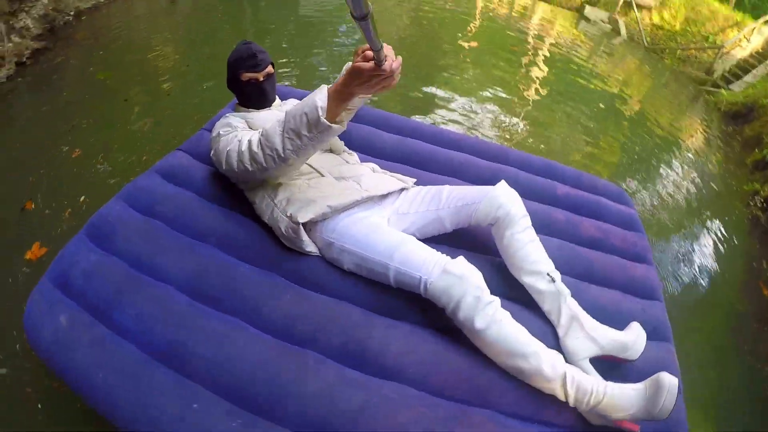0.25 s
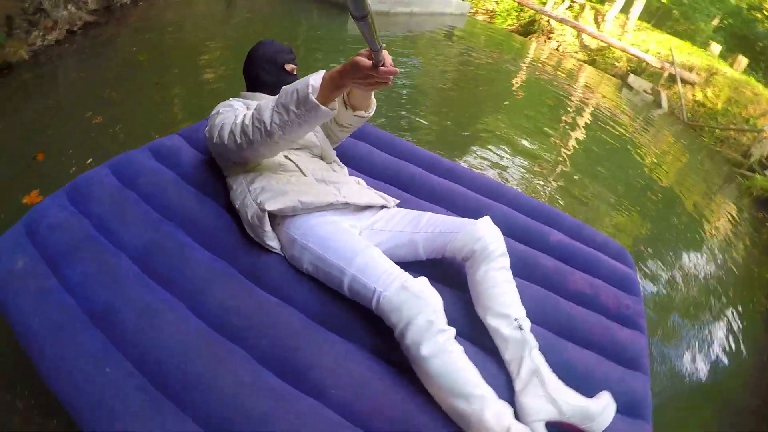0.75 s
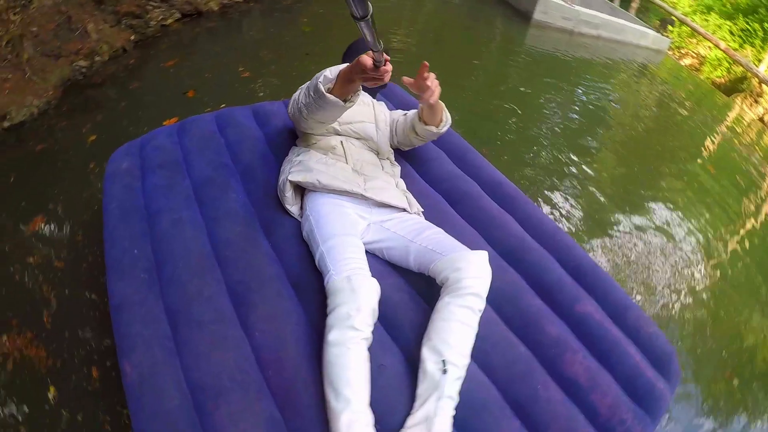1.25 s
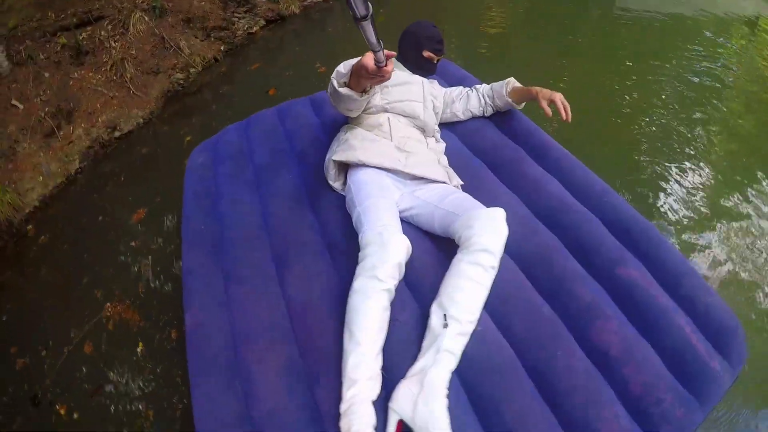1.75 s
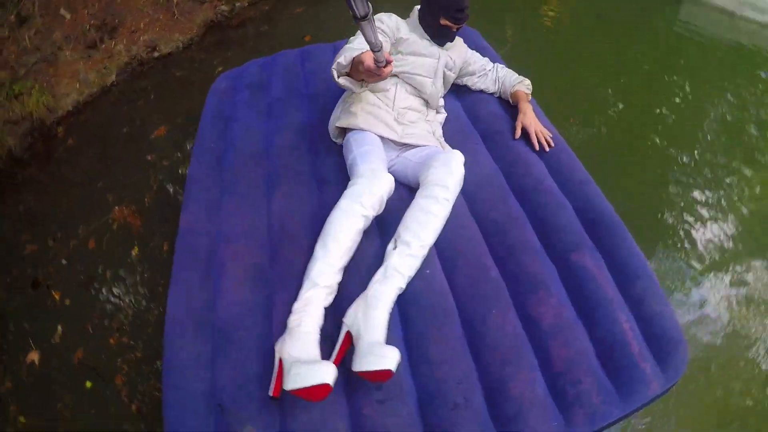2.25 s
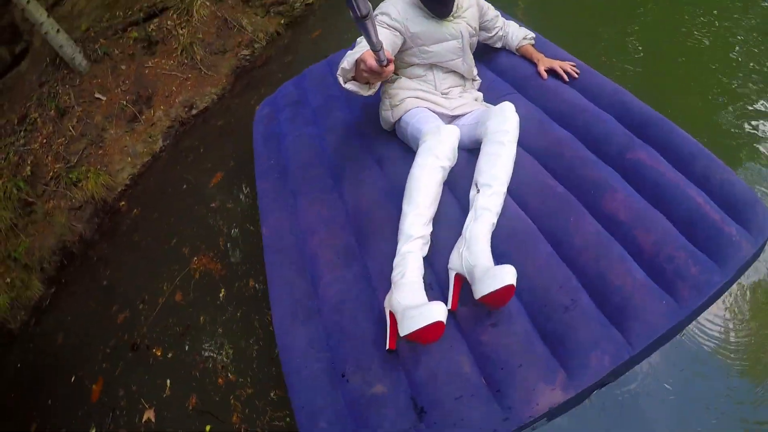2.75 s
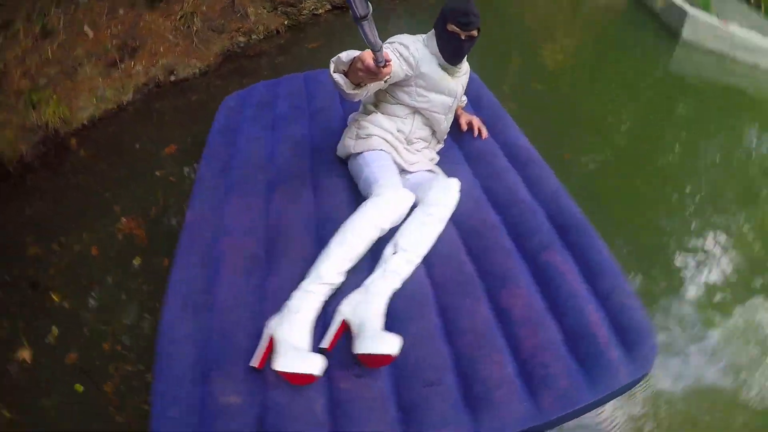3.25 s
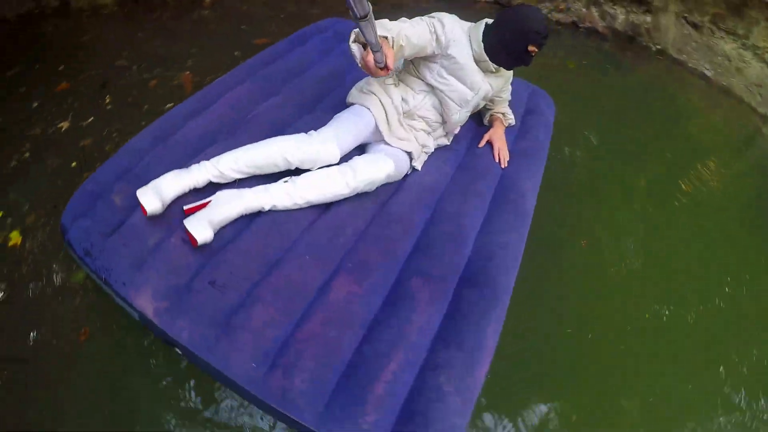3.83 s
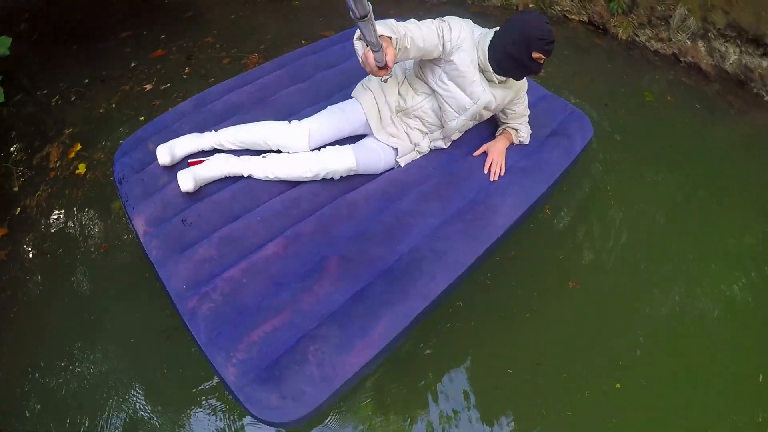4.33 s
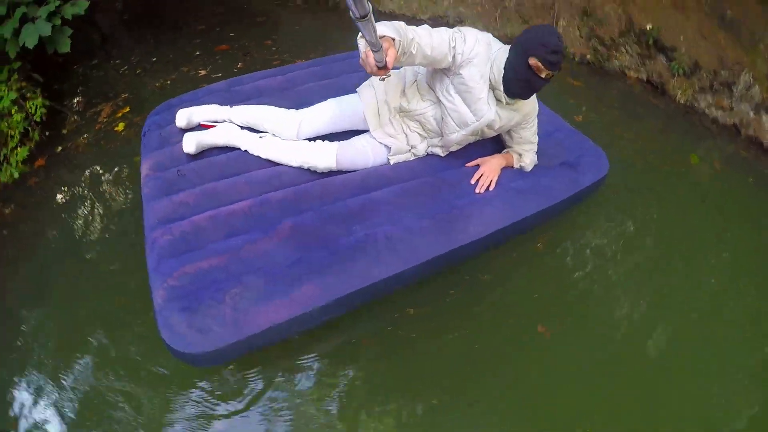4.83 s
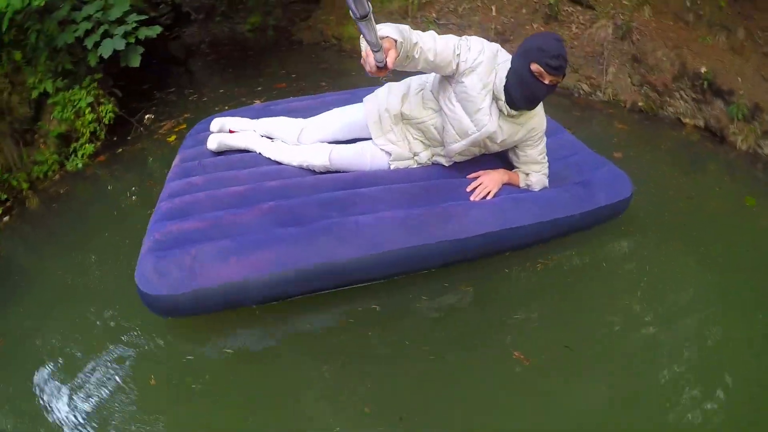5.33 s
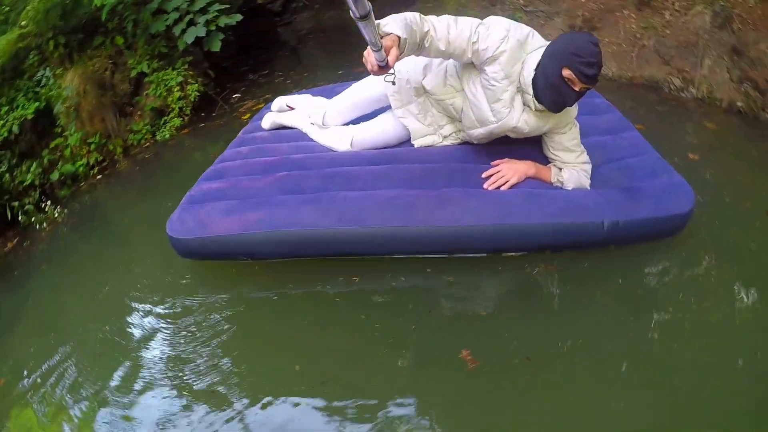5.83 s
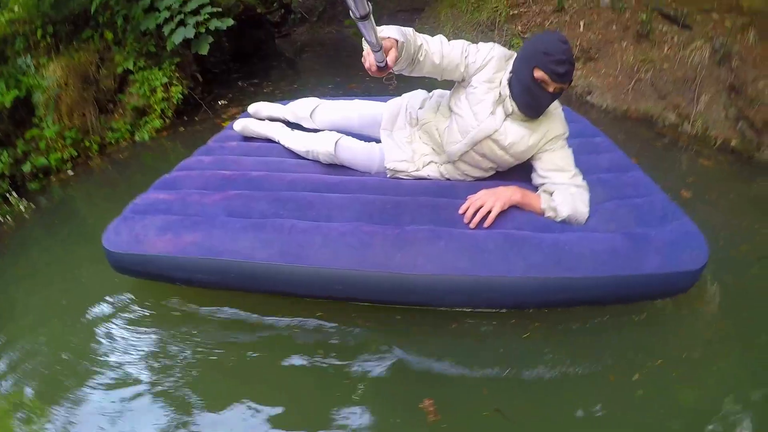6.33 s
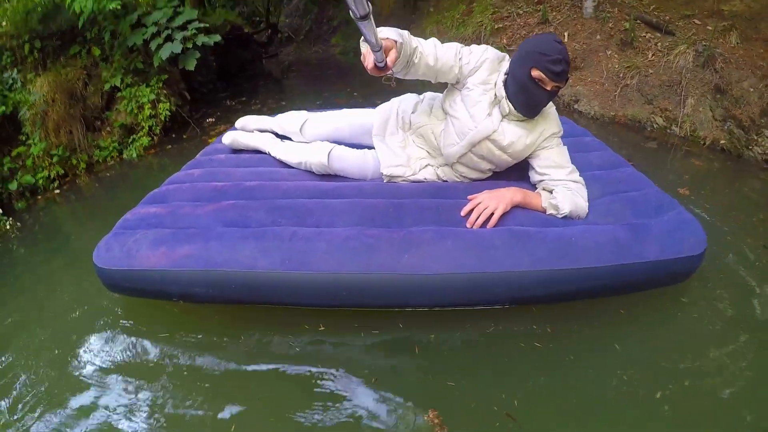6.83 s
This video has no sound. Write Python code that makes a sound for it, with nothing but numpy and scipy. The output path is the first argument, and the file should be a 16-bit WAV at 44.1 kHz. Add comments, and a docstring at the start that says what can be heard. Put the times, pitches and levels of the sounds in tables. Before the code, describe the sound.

Close, boomy handling thumps, dull knocks and rubbing drags on a camera pole, cloth rustling, over faint water wash, low air rumble and soft hiss.

```python
"""A person shifts about on an air mattress afloat on a pond, holding a camera on a pole.
The grip opens with booming shifts, joint knocks and a long drag; sine bends, filtered bursts and slips make them.
A dull cloth stroke and a second drag follow near 1 s; each drag leaves a faint high rasp, and cloth rustles to 2.2 s.
From 2.3 s bubbles of water lap faintly; from 3.3 s the shifts and knocks crowd again, then thin out to 6.8 s.
Noise bands run throughout: a low rumble of air, water washing, a soft hiss creeping up."""
import sys
import numpy as np
from scipy import signal
from scipy.fft import rfft, irfft, next_fast_len
from scipy.io import wavfile
from scipy.ndimage import map_coordinates

SR = 44100
rng = np.random.default_rng(int(sys.argv[2]) if len(sys.argv) > 2 else 0)


def to_wav(sig):
    """Store sig (one row per channel, or 1-D mono) as 16-bit WAV at the path in sys.argv[1].

    Samples outside -1..1 are clipped; the rate is SR.
    """
    pcm = np.clip(np.atleast_2d(sig), -1, 1) * 32767
    pcm = np.round(pcm).astype(np.int16)
    wavfile.write(sys.argv[1], SR, pcm.T)  # frames by channels


N = 312228
CLOCK_S = np.arange(N) / SR

# Grip shifts: (time [s], boom level [dB], nominal pole pitch [Hz], scuff level [dB])
GRIP_SHIFTS = [(0.118, -12, 108, -28.5), (0.364, -18, 103, -31), (0.596, -20, 106.6, -42.5),
               (0.723, -11, 135, -31), (1.068, -15.5, 111, -32.5), (1.424, -25.5, 110, -41),
               (1.522, -21.5, 103, -40), (1.607, -11, 143, -28), (1.688, -16.5, 124, -36),
               (1.742, -12, 136.5, -44), (1.764, -12, 118, -54), (1.964, -15.5, 125, -36.5),
               (3.28, -27.5, 121, -38.5), (3.419, -17.5, 167.6, -40), (3.482, -19.5, 151, -36),
               (3.54, -13, 110, -30), (3.585, -15.5, 87, -35), (3.615, -8.5, 124, -34.5),
               (3.709, -23, 89, -32.5), (3.936, -20.5, 110, -35), (4.02, -24, 134, -40),
               (4.753, -22, 140.6, -45), (4.822, -20, 136, -45), (4.903, -18.5, 131.6, -37),
               (5.175, -14.5, 112.5, -38.5), (5.879, -28, 108, -40), (6.053, -22.5, 130, -37.5),
               (6.175, -26, 92, -40.5), (6.386, -18, 142.3, -36), (6.799, -9.5, 163, -33.5)]
# Sways as the body's weight lurches: (time [s], level [dB], sway pitch [Hz])
WEIGHT_LURCHES = [(0.118, -13, 54.7), (1.068, -11.5, 43), (1.608, -8, 40.2), (1.964, -13, 44.3),
                  (3.54, -16, 42.4), (3.616, -11.5, 38.4), (3.709, -17.5, 45.2), (5.175, -18.5, 50),
                  (5.88, -22, 48)]
# Pole joint knocks: (nominal time [s], knock level [dB], crack level [dB]), levels into the case
JOINT_KNOCKS = [(0.092, -20.5, -60), (0.116, -2.5, -39.5), (0.172, -14.5, -47), (0.22, -12.5, -59),
                (0.314, -18, -57), (0.724, -11.5, -58), (1.066, -9.5, -40), (1.134, -15, -39.5),
                (1.423, -34, -69), (1.519, -25, -50), (1.741, -11, -49), (1.961, -18.5, -49),
                (3.32, -18.5, -42.5), (3.487, -18.5, -56), (3.505, -21.5, -57), (3.538, -10, -41),
                (3.596, -26, -46), (4.747, -24, -52.5), (4.819, -31.5, -49), (5.174, -22, -68),
                (6.795, -19, -64)]
# Long drags of the hand: (start [s], fastest [s], friction end [s], boom level at rest [dB],
# nominal pole pitch [Hz], rasp surge at full speed [dB], sizzle surge at full speed [dB])
HAND_DRAGS = [(0.164, 0.317, .39, -12, 106, 22, 3.5), (1.077, 1.189, 1.22, -16.5, 108.4, 9.5, 9)]
# Camera case resonances: (frequency [Hz], width [Hz], mean level [dB])
CASE_MODES = [(212, 51, 3), (438, 93, -5), (603, 53, 3), (1030, 34, -14.5), (1584, 130, -14),
              (1853, 186, -9), (2270, 300, -18), (3110, 65, -21.5), (3700, 200, -13.5), (3960, 140, -22.5),
              (4500, 88, -18), (5570, 220, -34), (7660, 610, -31), (9900, 200, -21.5)]
# Small laps at the mattress: (time [s], mean bubble level [dB], mean-detune bubble pitch [Hz])
WATER_LAPS = [(2.287, -39, 1400), (2.519, -44, 1217), (2.929, -47, 1210), (3.221, -40, 1220),
              (3.291, -37, 1170), (4.741, -36.5, 1200), (5.875, -35.5, 1490), (6.061, -39, 1700),
              (6.298, -43, 1440), (6.358, -41, 1710), (6.434, -38, 1130)]
# Water washing around the mattress: (time [s], level before WASH_TRIM_DB and ripple [dB])
WASH_LEVELS = [(1.3, -54), (1.54, -47.5), (2.47, -47), (3.24, -52.5), (3.48, -43), (3.72, -49), (4.23, -45),
               (4.63, -51), (5.03, -46), (5.81, -52), (6.25, -46), (7.05, -48)]

# Scuff spectrum of sleeve on pole: (frequency [Hz], relative level [dB])
SCUFF_SPECTRUM = [(120, -19), (240, 24), (380, 8.5), (590, 16), (800, 0), (1050, 3.5), (1250, -1),
                  (1750, 4.5), (2700, -6.5), (3750, -2.5), (4700, -0.5), (5200, -14), (9000, -13.5),
                  (12000, -32)]
# Sizzle spectrum of the dragging hand: (frequency [Hz], relative level [dB])
SIZZLE_SPECTRUM = [(2500, -40), (4800, 0), (5300, -8), (5750, 1), (6250, -14), (6600, -12), (8000, -9.5),
                   (9800, -11.5), (11500, -36)]
# Brush spectrum of the sleeve: (frequency [Hz], relative level [dB])
SLEEVE_SPECTRUM = [(90, 3), (280, -3), (350, -3), (480, -6), (590, 1.5), (760, -18.5), (1050, -15.5),
                   (1250, -29), (1650, -13), (2000, -19.5), (2600, -37.5), (4500, -29), (5200, -35),
                   (12000, -60)]
# Air rumble spectrum: (frequency [Hz], relative level [dB])
RUMBLE_SPECTRUM = [(11, -23), (18, 1.5), (41, -1), (70, -6.5), (109, -8.5), (195, -13.5), (388, -33.5),
                   (415, -33), (450, -40.5), (580, -103), (990, -120)]
# Water wash spectrum: (frequency [Hz], relative level [dB])
WASH_SPECTRUM = [(150, -3), (330, 2), (560, -1.5), (800, -6.5), (1200, -8), (1800, -12.5), (2800, -19.5),
                 (4200, -22), (6500, -30), (10000, -58)]
# Hiss spectrum: (frequency [Hz], relative level [dB])
HISS_SPECTRUM = [(1500, -9.5), (3500, -2.5), (6000, -2.5), (7600, 0.5), (9300, 1), (10300, -4),
                 (11500, -14), (15300, -29)]
# Top fizz of the hiss: (frequency [Hz], relative level [dB])
FIZZ_SPECTRUM = [(8000, -30), (11500, -2), (13500, -5), (15300, -12)]
# Lingering rasp about its centre: (offset [Hz], relative level [dB])
WHINE_SPECTRUM = [(1, -15), (130, -4), (300, -14), (900, -22), (2000, -83)]

# shifts: time to peak push; lead of the sleeve; spring-back of the pole
SWELL_S, SCUFF_LEAD_S = 0.01, 0.0038
REBOUND_S, REBOUND_DB, REBOUND_PITCH_RATIO = 0.026, -6, 0.906
LURCH_SWELL_S = 0.017
# drags: time constants of hand speed; friction of a slow hand; surges at full speed
SPEED_UP_S, SLOW_DOWN_S = 0.045, 0.015
RUB_DB, RASP_DB, SIZZLE_DB = -33.5, -45, -49.5
RUB_SURGE_DB, BOOM_SURGE_DB = 3.5, 4
# each grab tightens the pole: share of pitch added, time to relax
GRAB_SHARP_RATIO, GRAB_S = 0.251, 0.0443
WHINE_HZ, WHINE_SAG_HZ_PER_S = 4500, 570
WHINE_DB, WHINE_FADE_DB_PER_S, WHINE_RISE_S = -50.5, 17, 0.012
BRUSH_START_S, BRUSH_END_S, BRUSH_DB = 0.814, 1.026, -23.5
BRUSH_ATTACK_S, BRUSH_RELEASE_S = 0.054, 0.078
RUSTLE_DB, RUSTLE_END_S, RUSTLE_RELEASE_S = -53.5, 2.19, 0.37
RUMBLE_DB, WASH_TRIM_DB = -31.5, 2.2
# hiss and fizz: levels approached, rise from the start, time constant
HISS_DB, HISS_RISE_DB, FIZZ_DB, FIZZ_RISE_DB, CREEP_S = -52.5, 4, -63.5, 25, 2.4
TOP_HZ = 15260


def amp(db):
    """Amplitude of a level in dB."""
    return 10 ** (np.asarray(db) / 20)


def unit(x):
    """Scaled to rms 1."""
    return x / np.sqrt(np.mean(x ** 2) + 1e-20)


def along(points, hz):
    """Gain of (Hz, dB) points on a log axis."""
    f, db = np.transpose(points)
    return amp(np.interp(np.log(hz + 1), np.log(f + 1), db))


def wobble(rate):
    """A smooth random curve, rate knots a second."""
    knots = rng.standard_normal(int(N * rate / SR) + 4)
    return map_coordinates(knots, [np.arange(N) * rate / SR])


def filtered(x, response):
    """x times a response of frequency."""
    size = next_fast_len(N + SR // 2)
    hz = np.fft.rfftfreq(size, 1 / SR)
    return irfft(rfft(x, size) * response(hz), size)[:N]


def noise(spectrum):
    """Coloured noise of rms 1."""
    return unit(filtered(rng.standard_normal(N), lambda hz: along(spectrum, hz)))


def fade(start_s, end_s, attack_s, release_s):
    """Attack, hold and release between two times: gain 0-1 per sample."""
    rise = (CLOCK_S - start_s) / attack_s
    fall = (end_s - CLOCK_S) / release_s
    return np.clip(np.minimum(rise, fall), 0, 1)


def add(track, s, sound):
    """Mix a sound in at s seconds."""
    start = max(round(s * SR), 0)
    track[start:start + len(sound)] += sound[:N - start]


def push_curve(t, peak_s):
    """A push that swells to 1 at peak_s and eases off."""
    return t / peak_s * np.exp(1 - t / peak_s)


def slips(rate, spread_db):
    """Stick-slip friction: tiny impulses at random moments, of uneven size."""
    happens = rng.random(N) < rate / SR
    uneven_db = spread_db * np.clip(rng.standard_normal(N), -2, 2)
    return happens * rng.standard_normal(N) * amp(uneven_db)


def case_ring(lo_hz, hi_hz, size=4096):
    """The case's causal answer, peak 1, to a contact exciting lo_hz to hi_hz; mode levels vary from ring to ring."""
    hz = np.fft.rfftfreq(size, 1 / SR) + 1
    power = np.zeros(len(hz))
    for mode_hz, width_hz, db in CASE_MODES:
        detuning = (mode_hz ** 2 - hz ** 2) / (hz * width_hz)
        power += amp(db + rng.standard_normal()) ** 2 / (1 + detuning ** 2)
    power = power / (1 + (lo_hz / hz) ** 6) / (1 + (hz / hi_hz) ** 8)
    # minimum phase: fold the cepstrum onto positive time
    cepstrum = irfft(np.log(power + 1e-12) / 2)
    cepstrum[1:size // 2] *= 2
    cepstrum[size // 2 + 1:] = 0
    ring = irfft(np.exp(rfft(cepstrum)))
    return ring / np.abs(ring).max()


def through(x, ring):
    """x played through a ringing body."""
    return signal.fftconvolve(x, ring)[:N]


def sliding(rate, lo_hz, hi_hz):
    """Slips ring the case while the contact travels: their echo along the pole shifts, and the colour with it."""
    x, n = slips(rate, spread_db=0.0), np.arange(N)
    echo_s = 0.000685 * np.exp(0.368 * wobble(14))
    echo = np.interp(n - echo_s * SR, n, x)
    return unit(through(x + 0.6 * echo, case_ring(lo_hz, hi_hz)))


def shifts():
    """Each shift of the grip bends the pole, which booms and springs back while the sleeve scuffs it."""
    booms, pressure = np.zeros(N), np.zeros(N)
    t = np.arange(SR // 4) / SR
    push = push_curve(t, SWELL_S)
    # pitch sags from 1.053 to 0.958 of nominal as the hand relaxes
    turns = np.cumsum(0.958 + 0.095 * np.exp(-t / 0.017)) / SR
    for s, boom_db, pole_hz, scuff_db in GRIP_SHIFTS:
        bend = (0, 0, pole_hz)
        rebound = (REBOUND_S, REBOUND_DB, pole_hz * REBOUND_PITCH_RATIO)
        for delay_s, db, hz in [bend, rebound]:
            phase = 2 * np.pi * hz * turns
            second_mode = 0.31 * push * np.sin(1.534 * phase)  # dies sooner
            add(booms, s + delay_s, amp(boom_db + db) * push * (np.sin(phase) + second_mode))
        add(pressure, s - SCUFF_LEAD_S, amp(scuff_db) * push)
    friction = slips(rate=3200, spread_db=1)
    cloth = unit(filtered(friction, lambda hz: along(SCUFF_SPECTRUM, hz)))
    return booms + pressure * unit(cloth * amp(1.6 * wobble(220)))


def lurches():
    """A heavy move sways the whole pole for a few slow cycles."""
    out, t = np.zeros(N), np.arange(SR // 4) / SR
    swell = push_curve(t, LURCH_SWELL_S)
    for s, db, hz in WEIGHT_LURCHES:
        add(out, s, amp(db) * swell * np.sin(2 * np.pi * hz * t))
    return out


def knocks():
    """A joint creeps for a moment, then lets go: a solid knock, a short chatter and a bright scrape."""
    dull, bright = np.zeros(N), np.zeros(N)
    t = np.arange(-SR // 20, SR // 20) / SR
    for s, knock_db, crack_db in JOINT_KNOCKS:
        # the chatter pauses around the blow itself
        chatter_level = 0.039 * np.exp(-np.abs(t) / 0.0055) * (np.abs(t) > 0.001)
        chatter = chatter_level * rng.standard_normal(len(t))
        crack = np.exp(-(t / 0.0028) ** 2) * rng.standard_normal(len(t))
        blow = t == 0
        add(dull, s + t[0] + 0.00152, amp(knock_db) * (chatter + blow))
        add(bright, s + t[0] + 0.0035, amp(crack_db) * crack)
    dull_ring = through(dull, case_ring(lo_hz=129, hi_hz=1720))
    return dull_ring + through(bright, case_ring(lo_hz=2640, hi_hz=8240))


def drags():
    """The hand slides along the pole: slips ring the case, brighter with speed, and keep the pole shuddering."""
    t, out = CLOCK_S, np.zeros(N)
    rub = sliding(rate=2200, lo_hz=420, hi_hz=2400)
    rasp = sliding(rate=2500, lo_hz=3330, hi_hz=4600)
    sizzle = noise(SIZZLE_SPECTRUM)
    waver = 1 + 0.12 * wobble(59.1)
    swell, catch = amp(1.8 * wobble(45)), amp(1.4 * wobble(240))
    for start, fastest, end, boom_db, pole_hz, rasp_surge_db, sizzle_surge_db in HAND_DRAGS:
        speed = np.exp(-np.maximum((fastest - t) / SPEED_UP_S, (t - fastest) / SLOW_DOWN_S))
        tight = 1 + GRAB_SHARP_RATIO * np.exp(-np.abs(t - start) / GRAB_S)
        phase = 2 * np.pi * np.cumsum(pole_hz * tight * waver) / SR
        bend = np.sin(phase) + 0.072 * np.sin(1.85 * phase)
        shudder = amp(boom_db + BOOM_SURGE_DB * speed) * bend
        friction = amp(RUB_DB + RUB_SURGE_DB * speed) * rub
        friction += amp(RASP_DB + rasp_surge_db * speed) * rasp
        friction += amp(SIZZLE_DB + sizzle_surge_db * speed) * sizzle
        # skin catches unevenly; the pole starts and stops more slowly
        out += fade(start, end, attack_s=0.007, release_s=0.013) * catch * friction
        out += fade(start, end + 0.019, attack_s=0.013, release_s=0.034) * swell * shudder
    return out


def brush():
    """Soft padded cloth slides by in one dense, dull stroke."""
    stroke = fade(BRUSH_START_S, BRUSH_END_S, BRUSH_ATTACK_S, BRUSH_RELEASE_S)
    return amp(BRUSH_DB) * stroke * noise(SLEEVE_SPECTRUM)


def whine():
    """After each drag a narrow, faint rasp lingers, fading and sinking in pitch."""
    out = np.zeros(N)
    band = noise(WHINE_SPECTRUM)
    for _, _, end, *_ in HAND_DRAGS:
        age_s = np.maximum(CLOCK_S - end, 0)
        centre_hz = WHINE_HZ - WHINE_SAG_HZ_PER_S * age_s
        carrier = np.sin(2 * np.pi * np.cumsum(centre_hz) / SR)
        level = np.minimum(age_s / WHINE_RISE_S, 1) * amp(WHINE_DB - WHINE_FADE_DB_PER_S * age_s)
        out += level * band * carrier
    return out


def rustle():
    """The jacket grazes the pole lightly until the person settles, ringing the case's upper resonances."""
    touch = np.clip((RUSTLE_END_S - CLOCK_S) / RUSTLE_RELEASE_S, 0, 1)
    return amp(RUSTLE_DB) * touch * sliding(rate=6000, lo_hz=2100, hi_hz=4600)


def laps(count=16):
    """Each lap bursts a spray of tiny, short-lived bubbles around one pitch."""
    out, t = np.zeros(N), np.arange(SR // 50) / SR
    for s, db, hz in WATER_LAPS:
        for delay, detune, size in rng.standard_normal((count, 3)):
            cycles = t * hz * np.exp(0.25 * detune)
            envelope = (1 - np.exp(-2 * cycles)) * np.exp(-cycles / 2)
            bubble = envelope * np.sin(2 * np.pi * cycles)
            add(out, s + 0.01 * abs(delay), amp(db + 2 * size) * bubble)
    return out


def wash():
    """Water washes around the mattress: coloured noise that rises, falls and ripples."""
    times_s, levels_db = np.transpose(WASH_LEVELS)
    wash_db = np.interp(CLOCK_S, times_s, levels_db)
    ripple_db = 0.9 * wobble(18)
    return amp(wash_db + WASH_TRIM_DB + ripple_db) * noise(WASH_SPECTRUM)


def rumble():
    """Air rumbles on the microphone: low noise of wavering level."""
    return amp(RUMBLE_DB + 2.8 * wobble(9)) * noise(RUMBLE_SPECTRUM)


def hiss():
    """Soft noise and its top fizz creep up exponentially towards their levels."""
    early = np.exp(-CLOCK_S / CREEP_S)
    body = amp(HISS_DB - HISS_RISE_DB * early) * noise(HISS_SPECTRUM)
    fizz = amp(FIZZ_DB - FIZZ_RISE_DB * early) * noise(FIZZ_SPECTRUM)
    return body + fizz


def scene():
    """Handling of the pole close to the microphone, over the pond."""
    handling = shifts() + lurches() + knocks() + drags() + brush() + whine() + rustle()
    background = laps() + wash() + rumble() + hiss()
    return (handling + background)[None]


def record(dry):
    """The camera keeps nothing above its band limit."""
    return filtered(dry[0], lambda hz: hz < TOP_HZ)[None]


dry = scene()
out = record(dry)
to_wav(out)
```